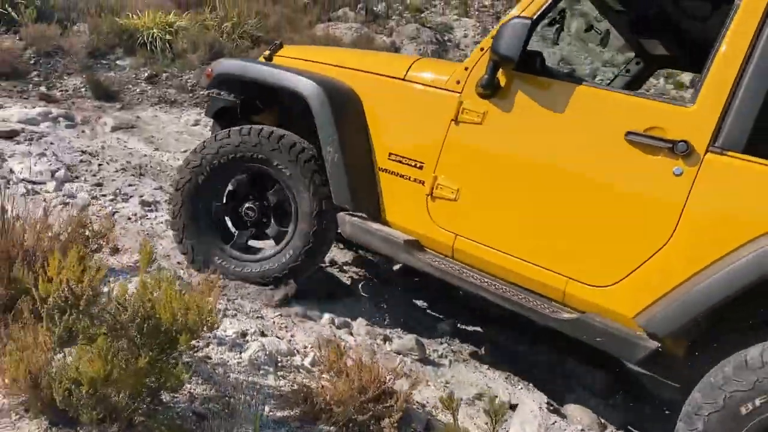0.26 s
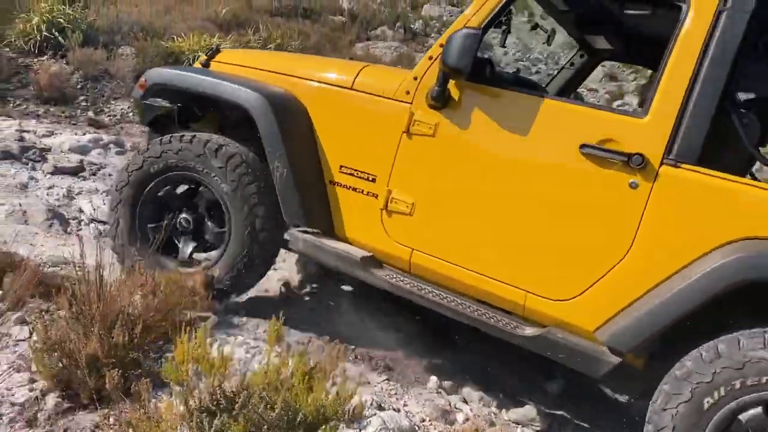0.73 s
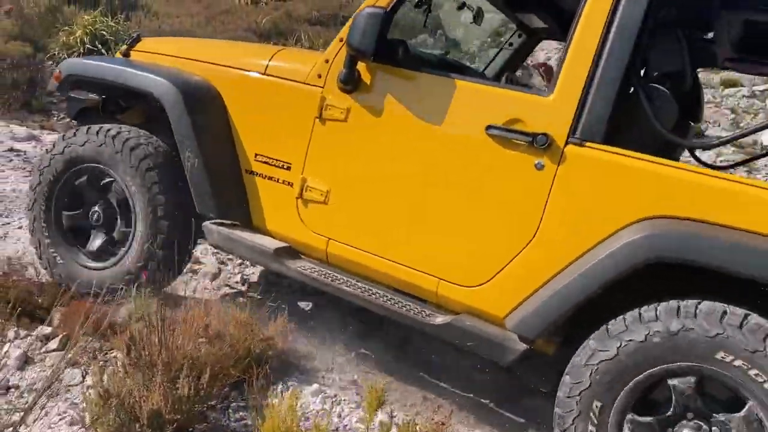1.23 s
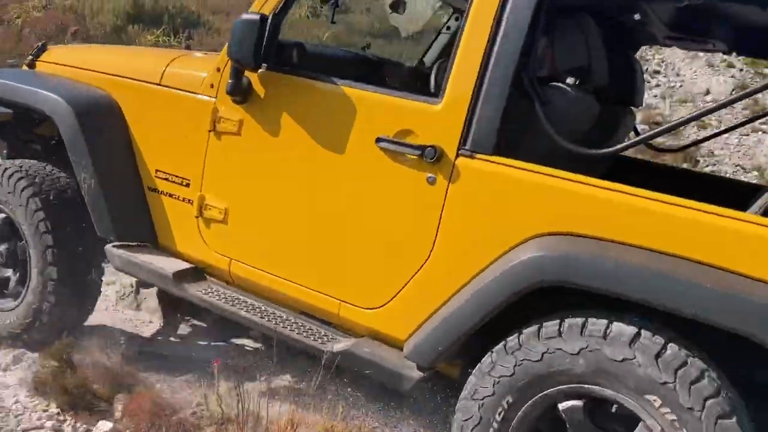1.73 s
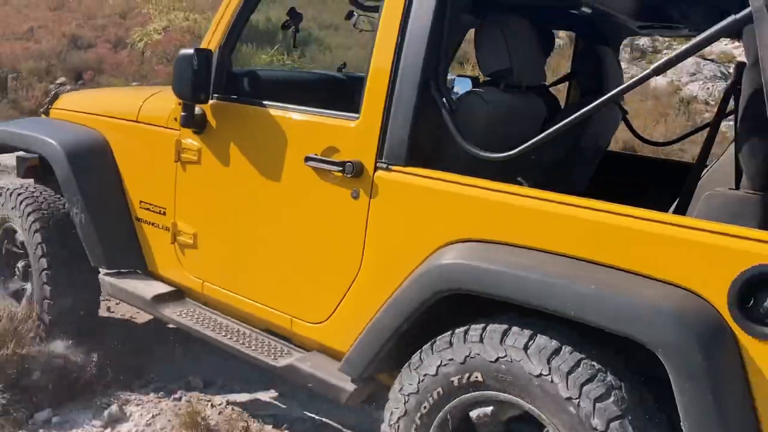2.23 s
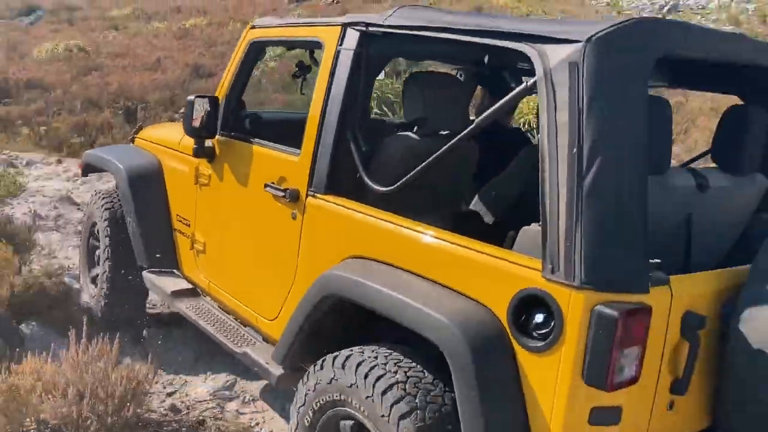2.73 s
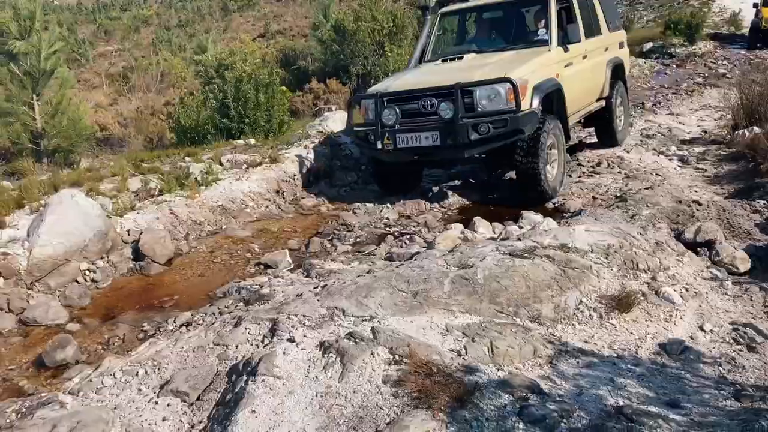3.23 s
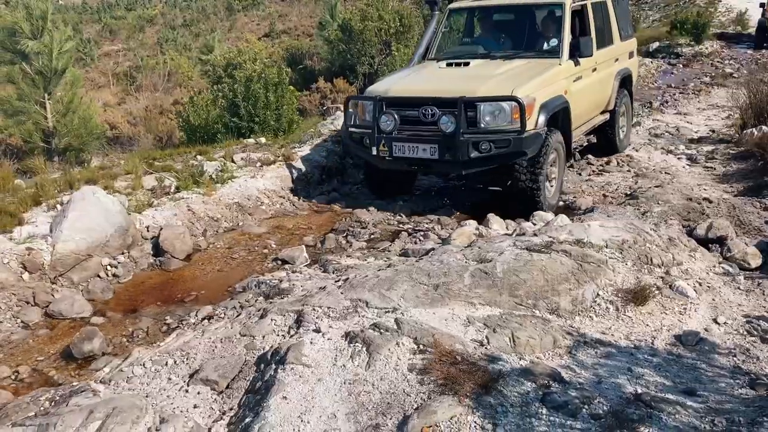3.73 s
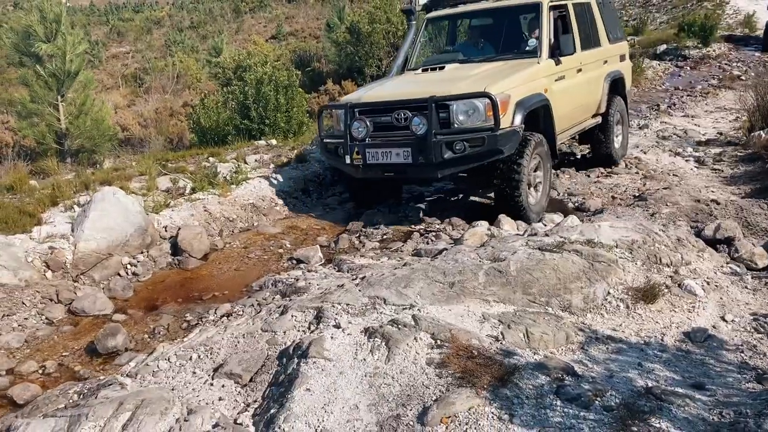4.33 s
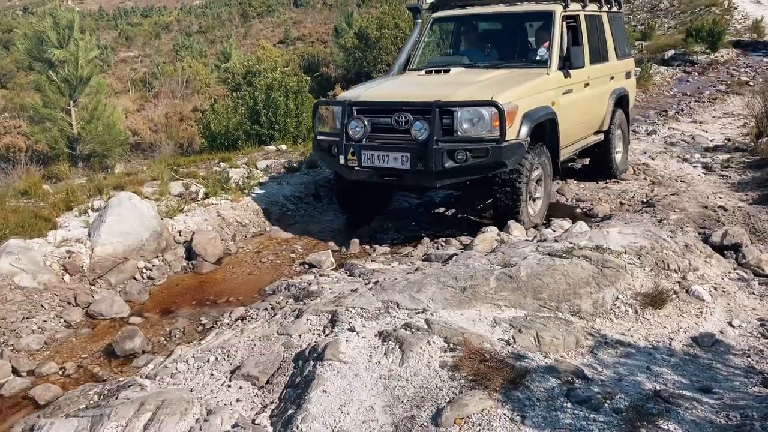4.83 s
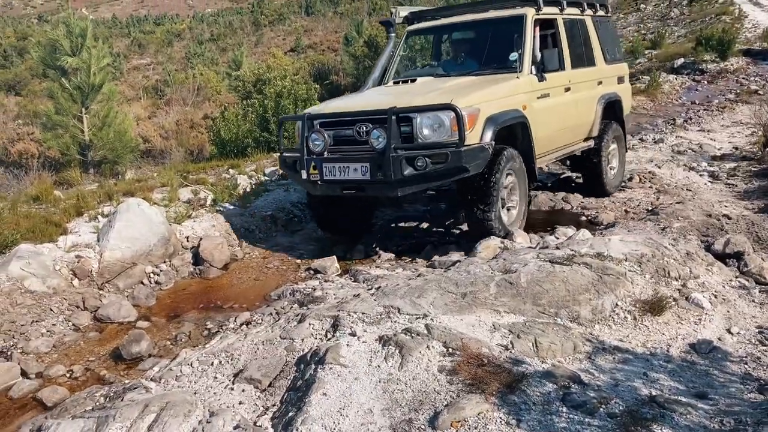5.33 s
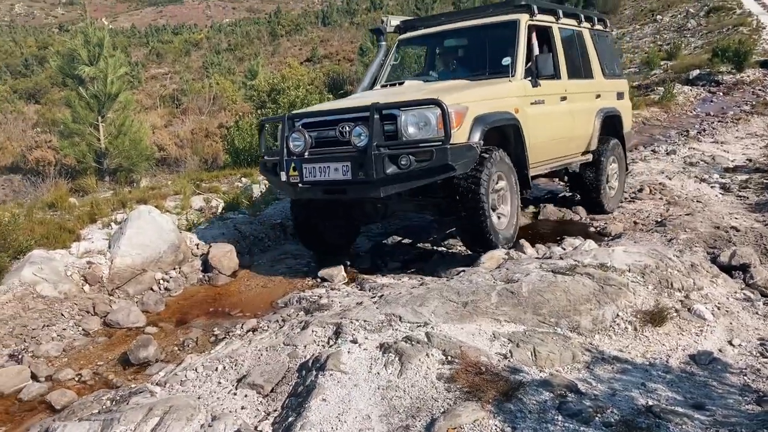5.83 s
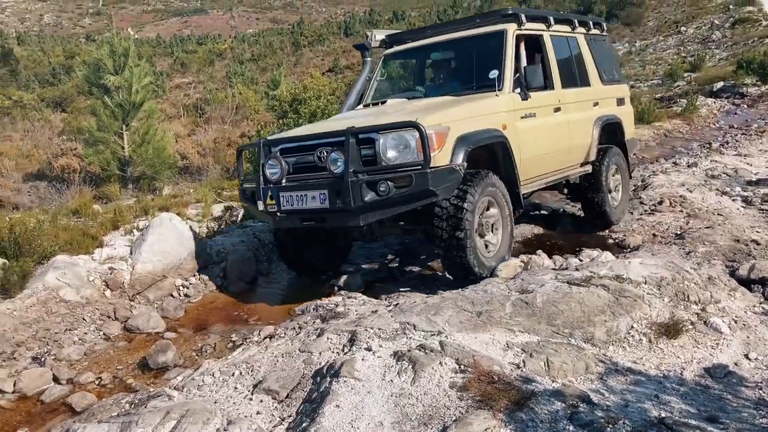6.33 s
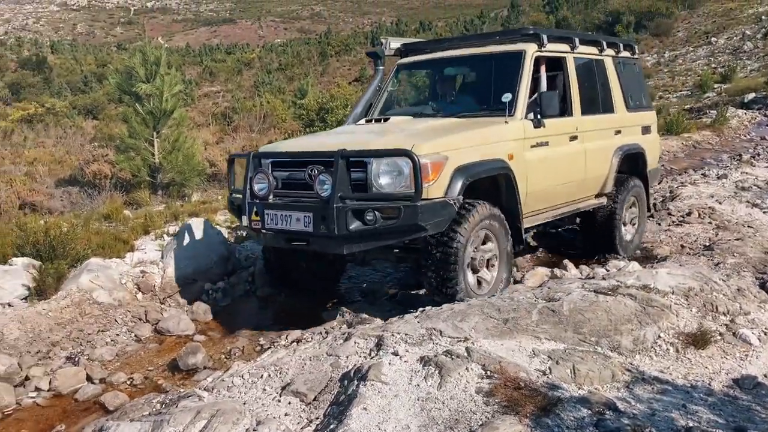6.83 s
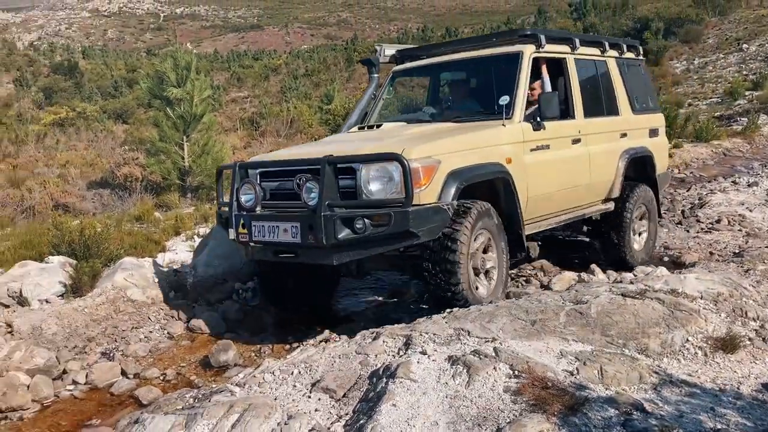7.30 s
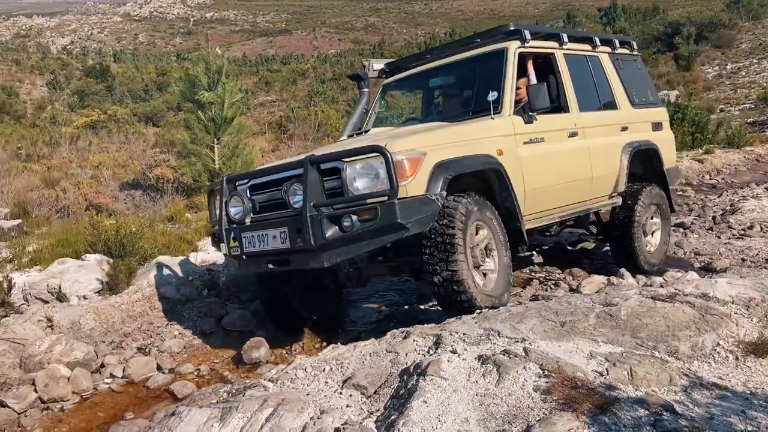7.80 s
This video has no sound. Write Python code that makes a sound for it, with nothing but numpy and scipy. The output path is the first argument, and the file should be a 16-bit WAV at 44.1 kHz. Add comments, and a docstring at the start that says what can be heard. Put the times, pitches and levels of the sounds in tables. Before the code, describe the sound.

A close outdoor stereo view of two off-road vehicles on loose rock. From 0 to 3.1 seconds, a petrol engine hums low and unsteadily beneath coarse tyre grinding, body rumble and bright flying grit. Dull axle thumps crowd the first half second and return near 1.2 to 1.4 and 1.8; a short scrape on metal comes at 0.7, with stones cracking and chips snapping, especially 1.4 to 2.2. The grind weakens after 2. At 3.1 it switches quickly to a deep diesel, its slow throbbing idle repeatedly surging and sagging, with rattling clatter and light hiss. A soft thump lands at 4.2. A thin, high brake whine enters faintly around 4.6, squeaks at 5.7, and returns in small squeals from 6.8 to 7.6. Stones crunch and knock near 6.6 to 7, then a louder cluster of rock clacks and snaps fills 7.8 to 8.

```python
"""Two off-road vehicles on loose rock

The first claws uphill: unsteady petrol-engine sines over shaped-noise rumble, tyre grind and grit.
A diesel then lumbers downhill: exhaust orders locked to a hunting crank, noise clatter, hiss, a thin brake whine.
Axle thumps are short sagging sines, stones are noise bursts, rocks and chips ring or snap, a plate is scraped.
Two microphone ports share the sound by frequency, with their own balance and phase gap."""
import sys
import numpy as np
from scipy import signal
from scipy.fft import rfft, irfft, next_fast_len
from scipy.io import wavfile
from scipy.ndimage import uniform_filter1d, map_coordinates

SR = 44100
rng = np.random.default_rng(int(sys.argv[2]) if len(sys.argv) > 2 else 0)


def put_to_file(sound):
    """Save the sound as 16-bit audio at rate SR, in the file named by the first command-line argument."""
    columns = np.atleast_2d(sound).T  # one column per channel
    safe = np.clip(columns, -1, 1)
    whole_steps = np.round(safe * 32767)
    wavfile.write(sys.argv[1], SR, whole_steps.astype(np.int16))


N = 355446

# colour of tyres grinding on stone: (frequency [Hz], relative density [dB per Hz])
GRIND_SPECTRUM = [(88, -19), (150, -2.5), (199, -6.5), (247, -2.5), (588, -12), (1310, -21), (1580, -21),
                  (2000, -47), (2600, -32.5), (4400, -120)]


def amp(db):
    """Amplitude ratio of a level in dB."""
    return 10 ** (np.asarray(db) / 20)


def unit(x):
    """x scaled to rms 1."""
    return x / np.sqrt(np.mean(x ** 2) + 1e-20)


def along(points, hz):
    """Interpolate (Hz, value) points on a log frequency axis."""
    f, v = np.transpose(points)
    return np.interp(np.log(hz + 1), np.log(f + 1), v)


def curves(rows):
    """One value per sample for each column after the time."""
    s, *cols = np.transpose(rows)
    return [np.interp(np.arange(N) / SR, s, c) for c in cols]


def wobble(rate_hz):
    """Smooth random curve with rate_hz knots a second."""
    knots = rng.standard_normal(int(N * rate_hz / SR) + 4)
    return map_coordinates(knots, [np.arange(N) * rate_hz / SR])


def filtered(x, response):
    """x times a complex response of frequency."""
    m = next_fast_len(N + SR // 2)
    return irfft(rfft(x, m) * response(np.fft.rfftfreq(m, 1 / SR)), m)[..., :N]


def noise(spectrum, pulsing=1, patchy_db=2.0):
    """Two unrelated noises, joint rms 1, that share pulsing, colour and time-frequency patches of random gain."""
    z = signal.stft(pulsing * rng.standard_normal((2, N)), nperseg=1024)[2]
    field = uniform_filter1d(rng.standard_normal(z.shape[1:]), size=3, axis=0)
    field = uniform_filter1d(field, size=5, axis=1)
    pair = signal.istft(z * amp(patchy_db * unit(field)), nperseg=1024)[1][:, :N]
    return unit(filtered(pair, lambda hz: amp(along(spectrum, hz))))


def grains(rate_hz, spread_db, life_s):
    """Envelope, rms 1, of random small contacts, each swelling to a peak near life_s / 2 and dying away."""
    size_db = spread_db * np.minimum(rng.exponential(size=N), 2)
    hits = (rng.random(N) < rate_hz / SR) * amp(size_db)
    pole = np.exp(-2 / (life_s * SR))
    return unit(signal.lfilter([1], np.poly([pole, pole]), hits))


def direct(x):
    """Pair of a sound and a silent unrelated twin."""
    return np.array([x, 0 * x])


def add_at(track, start_s, sound):
    """Mix a short sound into a track."""
    track[round(start_s * SR):][:len(sound)] += sound


def tone(db, rows):
    """Unsteady sine that fades in and out at the ends of its pitch curve."""
    hz, = curves(rows)
    t = np.arange(N) / SR
    fade_s = .05
    on = np.clip(np.minimum(t - rows[0][0] + fade_s, rows[-1][0] + fade_s - t) / fade_s, 0, 1)
    phase = 2 * np.pi * np.cumsum(hz) / SR + 0.43 * wobble(18)
    return on * amp(db + 0.52 * wobble(10)) * np.sin(phase)


def climb():
    """Petrol tones with body rumble and flying grit whose levels follow the grind of the tyres."""
    # engine and driveline tones that stand out: (mean level [dB], pitch curve as (time [s], pitch [Hz]))
    petrol_tones = [(-27.5, [(0.0, 101.6), (0.65, 97.5)]), (-32.5, [(0.4, 248), (0.92, 227), (1.26, 252.7),
                    (1.65, 237.2), (1.8, 256)]), (-30, [(1.12, 71.1), (1.5, 72.9), (2.25, 54.7),
                    (2.45, 57)]), (-31.5, [(2.46, 92.2), (3.02, 93.4)]), (-38, [(2.6, 177), (3.08, 189.3)])]
    # tyre grind as the wheels bite, slip and draw away: (time [s], level [dB])
    grind_rows = [(0.0, -27), (0.21, -26.5), (0.72, -26.5), (0.93, -28.5), (1.75, -26.5), (2.1, -31),
                  (2.4, -36), (2.76, -34), (3.08, -34.5)]
    # body rumble colour: (frequency [Hz], relative density [dB per Hz])
    rumble_spectrum = [(15, -53), (25, -15), (39, -17), (54, 2), (140, -7.5), (195, -26), (250, -11),
                       (320, -25), (550, -120)]
    # flying grit colour: (frequency [Hz], relative density [dB per Hz])
    grit_spectrum = [(900, -65), (1500, 0), (2500, 0.5), (4000, -7), (6000, -11), (9000, -8), (12000, -12),
                     (16000, -16)]
    t = np.arange(N) / SR
    grind_db, = curves(grind_rows)
    bite_db = grind_db + 29  # grind relative to -29 dB
    rumble_db = -31.5 + 0.6 * bite_db + 0.5 * t
    rumble = amp(rumble_db) * noise(rumble_spectrum, amp(1.7 * wobble(17)))
    grind = amp(grind_db) * noise(GRIND_SPECTRUM, 1 + .45 * grains(110, 3, .008))
    grit_db = -37 + 0.67 * bite_db - t
    grit = amp(grit_db) * noise(grit_spectrum, 1 + 0.047 * grains(100, 2.3, 0.0031))
    petrol = sum(tone(db, rows) for db, rows in petrol_tones)
    return direct(petrol) + rumble + grind + grit


def fuzzy(hz, width_hz, steady):
    """Narrow noise, rms 1, around a moving pitch, with a steady share: a pair."""
    white = rng.standard_normal((2, 2, N))
    fuzz = unit(filtered(white, lambda f: 1 / (1 + (f / width_hz) ** 2)))
    turn = 2 * np.pi * np.cumsum(hz) / SR
    return unit((steady + fuzz[0]) * np.cos(turn) + fuzz[1] * np.sin(turn))


def exhaust_orders(crank_hz, turn, boom_db, bass_db):
    """Diesel exhaust as cosines at crank orders, each level sloping with crank speed."""
    # exhaust tones: (crank order, relative level at 14.2 Hz [dB], slope [dB per Hz of crank speed])
    orders = [(3, -7, 2.9), (4, -22, 2.8), (5, -26, 1.3), (6, 0, 0), (7, -21, 4.1), (8, -13.5, 7),
              (9, 0, 0), (10, -14.8, -2.7), (11, -11, -.3), (12, -18.5, -3), (14, -19, 1.2),
              (15, -19.5, 1.7)]
    # phase offsets [rad], added to each order's phase: firing orders; orders between them up to 9; those above
    phase_offsets = [3, .3, -1.7]
    exhaust = 0
    for order, db, slope in orders:
        base_db = boom_db if order > 6 else bass_db
        level = amp(base_db + db + slope * (crank_hz - 14.2) + .7 * wobble(16))
        phase_offset = phase_offsets[0 if order % 3 == 0 else 1 + (order > 9)]
        phase_offset += 12 / order ** 2  # the outlet sends the lowest orders early
        late = .55 * (crank_hz - 15.4) * (order > 6)  # the boom of the pipe trails as the revs pass it
        exhaust = exhaust + level * np.cos(order * turn + phase_offset - late + .07 * wobble(12))
    return exhaust


def descent():
    """Diesel exhaust orders and puffing; combustion clatter and hiss beat faintly with each firing."""
    # hunting idle: (time [s], crank speed before smoothing [Hz])
    crank_rows = [(3.26, 12.436), (3.366, 12.61), (3.77, 16.374), (3.879, 15.863), (4.496, 13.707),
                  (4.813, 15.103), (5.235, 12.784), (5.585, 15.476), (5.909, 13.521), (6.212, 11.804),
                  (6.672, 16.216), (6.86, 15.824), (7.261, 13.883), (7.382, 14.178), (7.905, 14.43),
                  (7.906, 12.865)]
    # clatter as the vehicle draws near: (time [s], level [dB])
    clatter_rows = [(3.1, -37), (3.9, -34.5), (5.3, -35.5), (5.5, -33.5), (6.24, -37), (6.62, -32),
                    (7.3, -34.5), (7.8, -31.5), (7.9, -26), (8.06, -32)]
    # clatter colour: (frequency [Hz], relative density [dB per Hz])
    clatter_spectrum = [(120, -65), (200, -3.5), (221, 1.5), (247, -8), (322, -11), (365, -7), (457, -6.5),
                        (499, -6), (675, -14.5), (860, -10), (1040, -14), (1250, -11.5), (1700, -17),
                        (3270, -23.5), (3620, -35), (4000, -79), (5200, -71), (8800, -120)]
    # hiss colour: (frequency [Hz], relative density [dB per Hz])
    hiss_spectrum = [(1500, -62), (2500, -1.5), (4000, -4.5), (6000, -11), (9000, -8), (12000, -9.5),
                     (16000, -16)]
    # two faint moving clatter bands: (time [s], low band [Hz], high band [Hz], shared strength [dB])
    band_rows = [(3.1, 403.7, 839, -13), (5.0, 393.5, 858, 0.5), (5.9, 396.3, 953, 1.5),
                 (6.499, 459, 922, -2), (7.2, 451.5, 934, 5), (8.06, 479.4, 1054, 1)]
    # low and high band offsets against the clatter [dB]
    band_offsets_db = (-10, -13)
    # exhaust levels: (at 14 Hz [dB], [dB per Hz], [dB per Hz squared], [dB per Hz of speed a moment ago])
    boom_law = (-17.5, 0.5, -1.2, -1.5)
    bass_law = (-23, 0.6, 0, -2.5)
    crank_hz = uniform_filter1d(curves(crank_rows)[0], round(.15 * SR), mode="nearest")  # flywheel
    turn = 2 * np.pi * (np.cumsum(crank_hz) / SR + .882)
    # governor: overspeed cuts the fuel with a lag
    governor_s = 0.086
    over_hz = crank_hz - 14
    keep = np.exp(-1 / (governor_s * SR))
    before_hz = signal.lfilter([1 - keep], [1, -keep], over_hz)
    boom_db, bass_db = np.array([boom_law, bass_law]) @ [over_hz ** 0, over_hz, over_hz ** 2, before_hz]
    exhaust = exhaust_orders(crank_hz, turn, boom_db, bass_db)
    puff_spectrum = [(25, -40), (45, -8), (90, -4), (130, 0), (180, -6), (260, -15), (400, -60)]
    puffing = amp(boom_db - 19) * noise(puff_spectrum)
    firing = 1 + .14 * np.cos(3 * turn)  # three firings a turn
    clatter_db, = curves(clatter_rows)
    clatter = amp(clatter_db) * noise(clatter_spectrum, firing * (1 + .2 * grains(60, 3, .012)))
    hiss_db = -45.5 + 0.42 * (clatter_db + 33.5)
    hiss = amp(hiss_db) * noise(hiss_spectrum, firing * (1 + 0.11 * grains(40, 2.4, 0.016)))
    *bands_hz, strength_db = curves(band_rows)
    bands = sum(amp(clatter_db + strength_db + db) * fuzzy(hz, 46, 0.35)
                for hz, db in zip(bands_hz, band_offsets_db))
    return direct(exhaust) + puffing + clatter + firing * bands + hiss


def thumps():
    """Each jolt is a few cycles of the chassis, its pitch sagging as the tyre settles, with a crunch of stone."""
    # axle thumps: (time [s], envelope peak [dB], nominal pitch [Hz], rise [s])
    thump_rows = [(0.038, -18, 258, 0.0056), (0.168, -19, 343, 0.0064), (0.192, -20, 245, 0.007),
                  (0.211, -14, 200, 0.0031), (0.248, -16, 260, 0.011), (.279, -13, 304, .0042),
                  (.359, -15, 350, 0.0073), (0.379, -16, 252, 0.0055), (0.424, -23, 302, 0.0056),
                  (.428, -18, 123, 0.0075), (0.541, -12, 246, 0.0058), (.945, -24.5, 189, 0.01),
                  (1.204, -17, 180, 0.0062), (1.227, -11, 145, 0.0073), (1.316, -17.5, 327, 0.0066),
                  (1.334, -19.5, 259, 0.0053), (1.402, -13.5, 150, .006), (1.418, -20, 268, .006),
                  (1.829, -13.5, 156, 0.0096), (1.931, -23, 345, 0.0081), (2.397, -17, 227, 0.0062),
                  (2.703, -19.5, 103, 0.015), (2.854, -29, 200, 0.0058), (2.9, -21.5, 430, 0.0033),
                  (4.168, -31, 430, 0.0098), (4.192, -22, 336, 0.0082)]
    crunch_offset_db = -12
    out, crunch, t = np.zeros(N + SR), np.zeros(N + SR), np.arange(SR // 8) / SR
    for s, db, hz, rise_s in thump_rows:
        rise = t / rise_s
        shape = (rise * np.exp(1 - rise)) ** 2
        # pitch sags from 1.77 to 0.55 times nominal
        cycles = hz * (.55 * t + 1.22 * rise_s * (1 - np.exp(-rise)))
        add_at(out, s, amp(db) * shape * np.sin(2 * np.pi * cycles))
        add_at(crunch, s, amp(db + crunch_offset_db) * shape)
    return direct(out[:N]) + crunch[:N] * noise(GRIND_SPECTRUM)


def stones():
    """A stone cracks or rolls under a tyre: body and treble noise rasp for a moment, then die away."""
    # stones: (time [s], body level [dB], treble level [dB])
    stone_rows = [(0.333, -39, -40), (0.359, -37, -47), (0.423, -36, -43), (0.63, -29, -52),
                  (1.212, -33, -54), (1.44, -31.5, -39), (1.509, -30.5, -37.5), (1.638, -32, -38),
                  (1.677, -31.5, -44), (1.759, -32, -36), (1.814, -33, -38.5), (2.021, -33.5, -38.5),
                  (2.28, -39, -40.5), (3.312, -44, -41.5), (3.518, -42, -47), (4.187, -42, -43),
                  (6.0794, -49, -42), (6.6434, -32, -40), (6.956, -36, -56), (7.6196, -38, -43),
                  (7.697, -30, -58), (7.8486, -36, -48), (7.92, -30, -43), (7.95, -33, -44)]
    # body colour: (frequency [Hz], relative density [dB per Hz])
    body_spectrum = [(300, -2.5), (500, 2), (750, -2), (1070, 3), (1600, -5.5), (2500, -5.5), (3600, -6.5),
                     (5000, -19), (7000, -72)]
    # treble colour: (frequency [Hz], relative density [dB per Hz])
    treble_spectrum = [(3000, -17), (5000, 10.5), (6000, 7), (9000, 14), (16000, -0.5)]
    rise_s, decay_s = .003, 0.04
    body, treble, t = np.zeros(N + SR), np.zeros(N + SR), np.arange(SR // 4) / SR
    shape = (1 - np.exp(-t / rise_s)) * np.exp(-(t / decay_s) ** 2)
    for s, body_db, treble_db in stone_rows:
        add_at(body, s, amp(body_db) * shape)
        add_at(treble, s, amp(treble_db) * shape)
    rasp = noise(body_spectrum, 1 + 0.45 * grains(200, 2.4, 0.0011))
    return body[:N] * rasp + treble[:N] * noise(treble_spectrum)


def whine():
    """A brake sings on a fuzzy line and squeaks on a purer one when it grabs."""
    # brake drag: (time [s], pitch [Hz], mean level [dB])
    drag_rows = [(4.6, 3530, -60), (5.1, 3436, -55), (5.6, 3600, -56), (5.75, 3640, -48),
                 (6.05, 3610, -45.5), (6.2, 3480, -53), (6.45, 3480, -55), (6.8, 3620, -52),
                 (7.13, 3650, -52), (7.24, 3620, -53), (7.6, 3640, -44.5), (8.06, 3630, -52)]
    # brake grabs: (middle [s], peak level [dB], pitch [Hz], half length to 1/e [s])
    squeak_rows = [(5.677, -46, 3590, .022), (5.713, -37.5, 3615, 0.023), (5.769, -48, 3680, .02),
                   (5.838, -49, 3590, 0.027), (5.885, -54, 3630, .03), (6.775, -43, 3590, 0.022),
                   (7.066, -47, 3650, 0.048), (7.16, -48, 3630, 0.044), (7.304, -46, 3620, 0.043),
                   (7.455, -45, 3615, .025), (7.578, -47, 3590, .035), (7.645, -45, 3640, .025)]
    drag_hz, drag_db = curves(drag_rows)
    t = np.arange(N) / SR
    grab_hz, = curves([(s, pitch_hz) for s, db, pitch_hz, half_s in squeak_rows])
    grabs = sum(amp(db) * np.exp(-((t - s) / half_s) ** 2) for s, db, pitch_hz, half_s in squeak_rows)
    drag = (t > drag_rows[0][0]) * amp(drag_db + 1.7 * wobble(21)) * fuzzy(drag_hz, 130, 0.25)
    return drag + grabs * fuzzy(grab_hz, 90, 1.5)


def knocks():
    """Rocks knock together, ringing briefly on a few steady modes, struck a little differently each time."""
    # knocks: (time [s], strike level [dB], main pitch [Hz])
    knock_rows = [(6.957, -21.5, 624), (6.983, -25, 600), (7.86, -23, 500), (7.875, -24, 620),
                  (7.888, -29, 2060), (7.905, -23, 720), (7.924, -26, 1980), (7.934, -19, 690),
                  (7.954, -23, 800), (7.972, -28, 1450), (7.985, -31, 3050), (8.027, -27, 700),
                  (8.048, -26, 1000)]
    # rock modes: (ratio to main pitch, mean level [dB])
    modes = [(.71, -5), (1, 0), (1.39, -5), (1.65, -7), (2.3, -11)]
    rise_s, ring_s = 0.00099, .007
    out, t = np.zeros(N + SR), np.arange(SR // 12) / SR
    chance = rng.standard_normal((len(knock_rows), len(modes)))
    shape = (1 - np.exp(-t / rise_s)) * np.exp(-t / ring_s)
    for (s, db, hz), draw in zip(knock_rows, chance):
        ring = sum(amp(mode_db + 2 * d) * np.sin(2 * np.pi * hz * ratio * t)
                   for (ratio, mode_db), d in zip(modes, draw))
        add_at(out, s, amp(db) * shape * ring)
    return direct(out[:N])


def scrape():
    """A rock drags along the skid plate: quick uneven slips and noise ring the resonances of the steel."""
    # scrape: start [s], length [s], level [dB], mean slip rate [Hz]
    start_s, length_s, db, slip_hz = (.6755, .024, -21, 545)
    # plate resonances: (frequency [Hz], width [Hz], level [dB])
    plate = [(530, 220, 0.5), (1030, 380, -0.5), (1650, 420, -4), (2600, 930, -5), (3200, 360, -8),
             (4520, 230, -26), (5910, 110, -5)]
    t = np.arange(N) / SR - start_s
    slip_count = np.floor(np.cumsum(slip_hz * (1 + .06 * wobble(300))) / SR)
    slips = np.diff(slip_count, prepend=0) * amp(3.3 * wobble(400))
    drag = direct(unit(slips)) + 1.1 * rng.standard_normal((2, N))

    def resonances(f):
        return sum((-1) ** k * amp(mode_db) * 1j * f * width / (centre ** 2 - f * f + 1j * f * width)
                   for k, (centre, width, mode_db) in enumerate(plate))
    fade = np.exp(-np.clip(t / length_s, 0, 9) ** 4)
    return amp(db) * (t > 0) * fade * unit(filtered(drag, resonances))


def ticks():
    """Chips of stone snap: a decaying sine of a few cycles with a short gritty tail."""
    # chips: (time [s], snap level [dB], pitch [Hz])
    tick_rows = [(.294, -34, 11000), (0.367, -18.5, 6960), (1.1618, -22, 11000), (1.5316, -24, 8000),
                 (1.5633, -23, 10000), (1.7639, -29, 10000), (2.057, -21, 9000), (2.1495, -15.5, 11500),
                 (2.402, -27, 5000), (2.757, -26, 595), (2.843, -30, 4000), (3.3199, -23, 10000),
                 (3.5309, -34, 9000), (6.6438, -26, 9000), (7.6127, -24, 9000), (7.8256, -30, 8000),
                 (7.698, -26, 2960), (7.925, -20, 2710), (7.9553, -29, 6500), (7.959, -31, 2600),
                 (8.038, -24, 3000)]
    decay_cycles, tail_s, tail_offset_db = 2.3, 0.0041, -14
    out, t = np.zeros(N + SR), np.arange(SR // 40) / SR
    for s, db, hz in tick_rows:
        add_at(out, s, amp(db) * np.exp(-t * hz / decay_cycles) * np.sin(2 * np.pi * hz * t))
        band = [hz / SR, min(3.6 * hz / SR, .9)]  # in units of half the sample rate
        grit = signal.lfilter(*signal.butter(1, band, "band"), rng.standard_normal(len(t)))
        add_at(out, s, amp(db + tail_offset_db) * np.exp(-t / tail_s) * unit(grit))
    return direct(out[:N])


def ports(pair, lean):
    """Two ports: alike in the bass, nearly unrelated near 4 kHz; higher up their phase gap grows by half turns."""
    # likeness of the ports below turn_hz: (frequency [Hz], correlation)
    likeness = [(60, 0.75), (300, 0.97), (700, 0.81), (1700, 0.65), (3300, 0.12), (4500, 0.14),
                (5800, 0.22), (6800, 0.71)]
    # left over right, times lean below 500 Hz, none above turn_hz: (frequency [Hz], balance [dB])
    balance = [(60, -8.5), (200, -2), (700, 0.5), (2400, 1.7), (5000, 1.3), (6700, 1.5)]
    turn_hz, step_hz = 6900, 2270
    lead_s, lead_top_hz = 0.00004, 1500  # the left port hears the bass and middle first

    def share(hz):
        alike = np.where(hz < turn_hz, np.clip(along(likeness, hz), 0, 1), 1)
        u = np.arccos(alike) / 2
        return np.array([np.cos(u), np.sin(u)])

    def tilt(hz):
        steps = np.maximum((hz - turn_hz) / step_hz, 0)
        gap = np.pi * (steps // 1 + np.clip(2 * (steps % 1) - .5, 0, 1))
        lead = 2 * np.pi * lead_s * hz * (hz < lead_top_hz)
        left_db = along(balance, hz) * np.where(hz < 500, lean, hz < turn_hz)
        half = amp(left_db / 2) * np.exp(.5j * (gap + lead))  # each port takes half
        return np.array([half, 1 / half])
    common, apart = filtered(pair, share)
    return filtered(np.array([common + apart, common - apart]), tilt)


def scene():
    """The climb gives way to the descent in a quick crossfade; loose sounds run through both."""
    takeover_s, fade_s = 3.095, .02
    second = np.clip((np.arange(N) / SR - takeover_s) / fade_s, 0, 1)
    loose = whine() + thumps() + stones() + ticks() + knocks() + scrape()
    first_pair = (1 - second) * (climb() + loose)
    second_pair = second * (descent() + loose)
    return ports(first_pair, lean=0.31) + ports(second_pair, lean=0.46)


def record(dry):
    """The microphone keeps nothing above its band limit."""
    top_hz = 15870
    return filtered(dry, lambda hz: hz < top_hz)


dry = scene()
out = record(dry)
put_to_file(out)
```